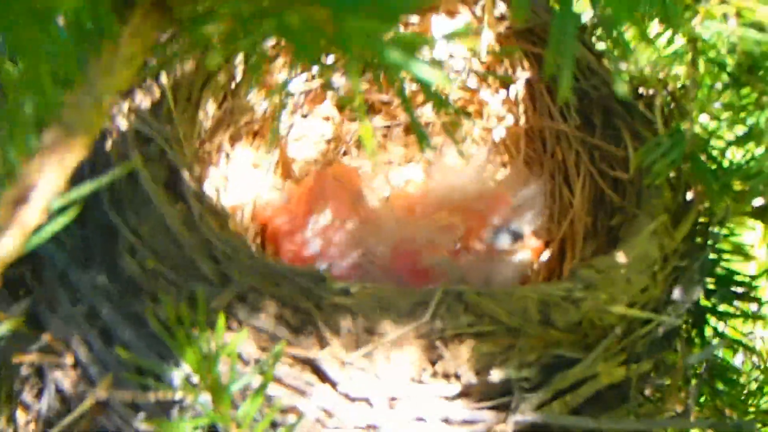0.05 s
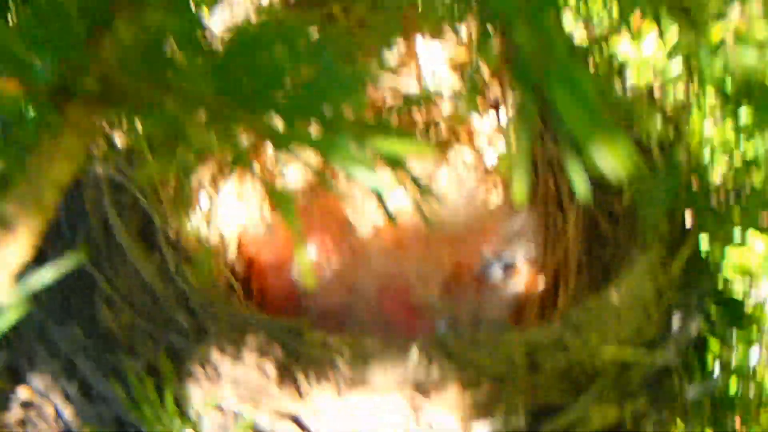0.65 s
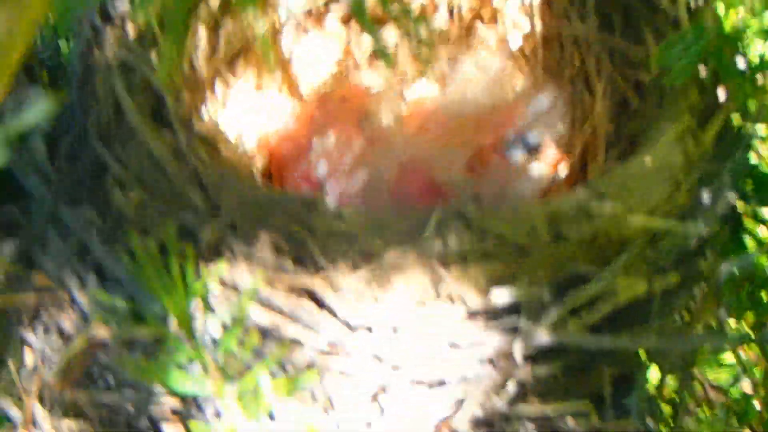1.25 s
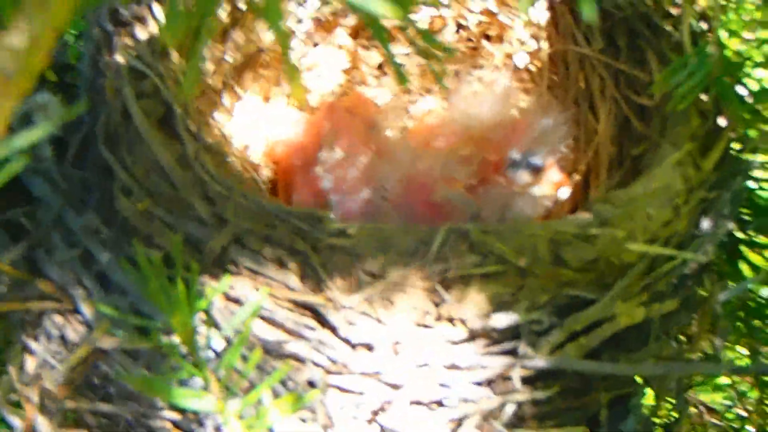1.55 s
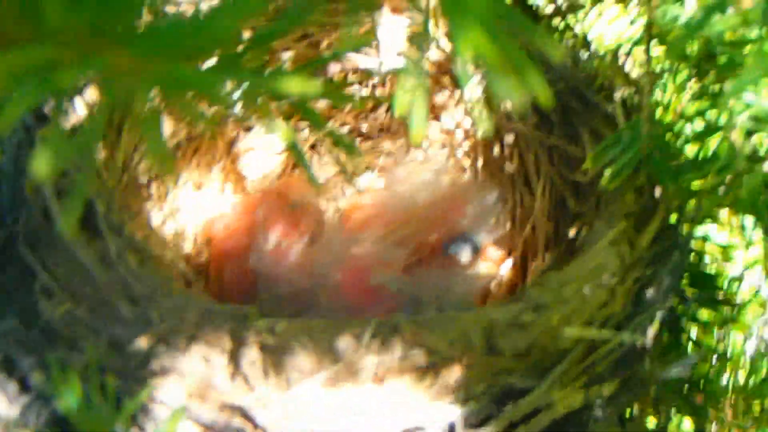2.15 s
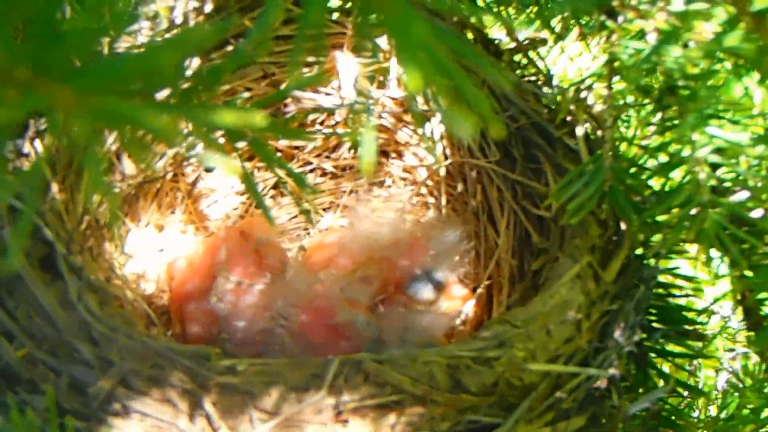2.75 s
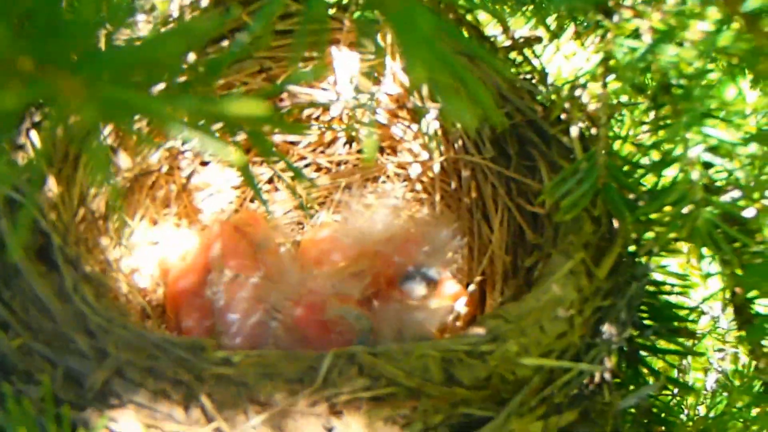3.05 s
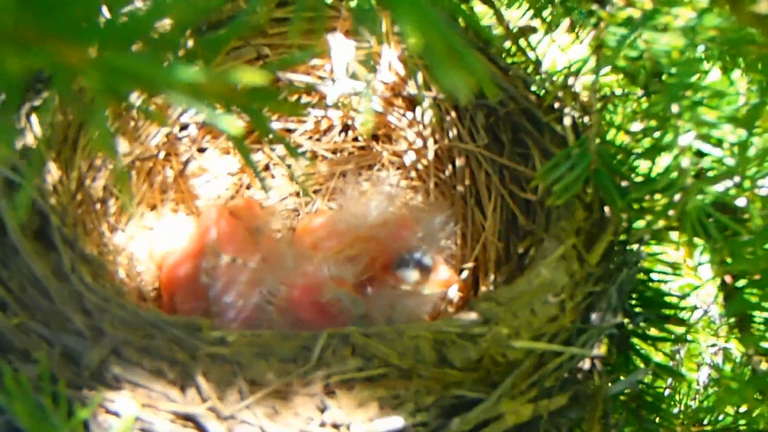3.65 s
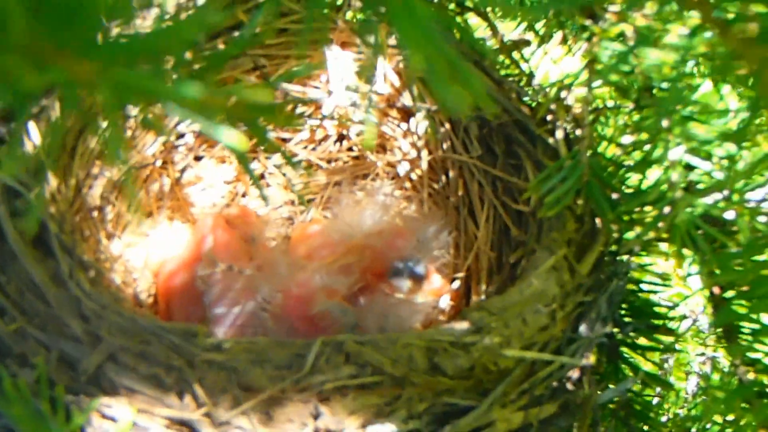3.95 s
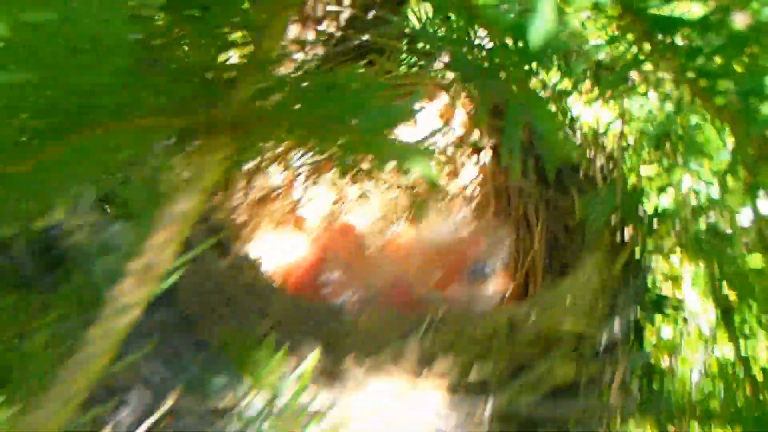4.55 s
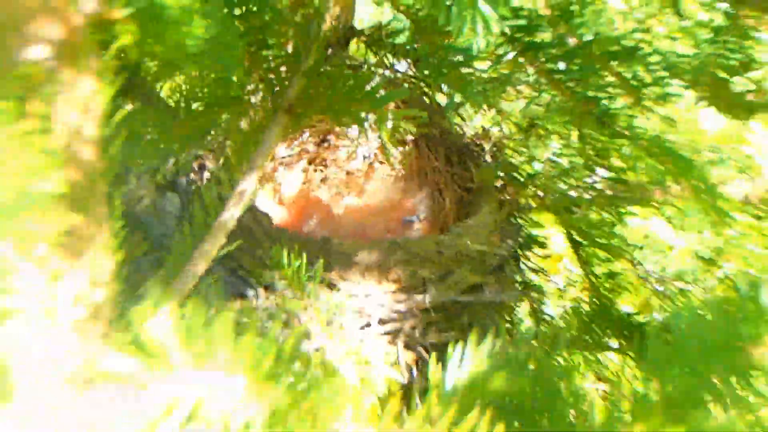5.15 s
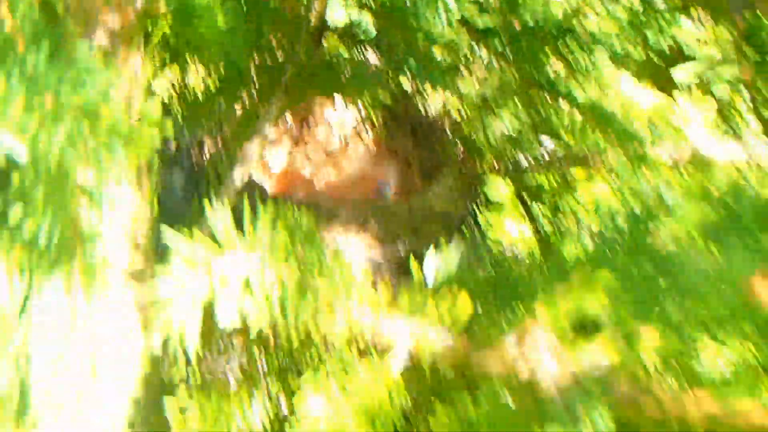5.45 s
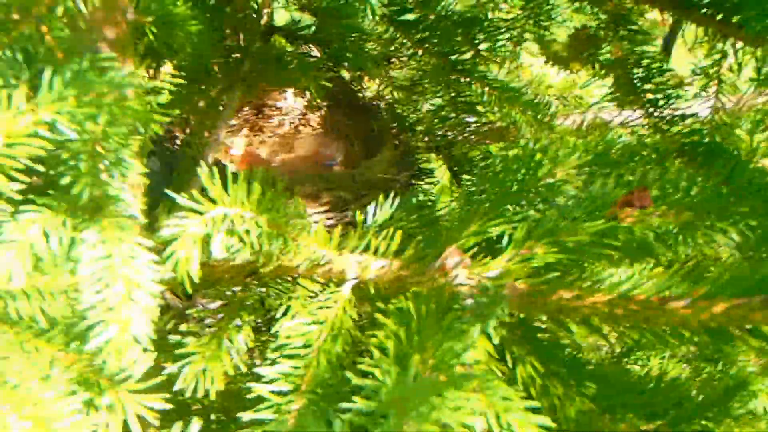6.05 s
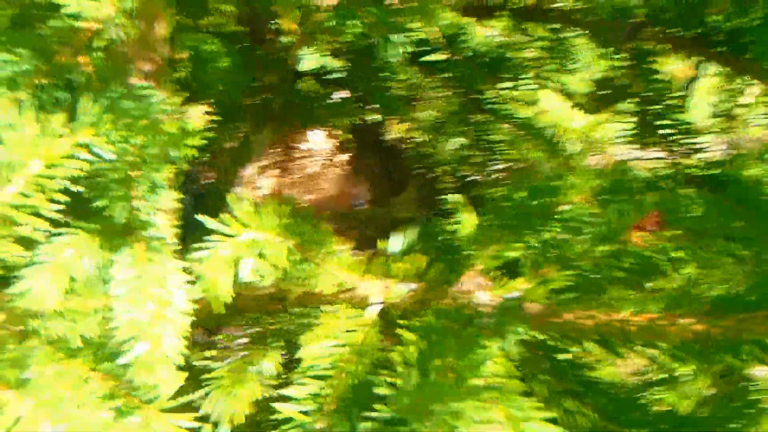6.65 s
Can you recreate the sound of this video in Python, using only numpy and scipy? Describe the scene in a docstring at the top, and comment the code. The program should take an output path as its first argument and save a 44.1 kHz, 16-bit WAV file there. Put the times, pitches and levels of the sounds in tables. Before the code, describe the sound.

Outdoors among evergreen branches, needles scrape and twigs crackle very close to the microphone, along with low handling rumble and knocks. After a lull, the branches sweep past once more with a quick cluster of snaps and a soft sleeve slide. Brief peeps of small distant birds come throughout, and at the end only they and a gentle airy hiss remain.

```python
"""Among the branches of a spruce, a hand-held camera pushes in, rests over a nest and draws back.
Needles sweep over its housing in a grainy swish, and twigs snap against it and make it ring a little.
Dragging branches make it rumble, and the hand bumps it now and then. Small birds chirp some way off
over soft outdoor air, and the camera's electronics hiss and whine faintly."""
import sys
import numpy as np
from scipy import signal
from scipy.fft import rfft, irfft
from scipy.io import wavfile

SR = 44100
rng = np.random.default_rng(int(sys.argv[2]) if len(sys.argv) > 2 else 0)


def master(y):
    """Save y as 16-bit WAV."""
    cut = np.clip(np.atleast_2d(y).T, -1, 1)
    pcm = np.round(cut * 32767)  # scale
    wavfile.write(sys.argv[1], SR, pcm.astype(np.int16))


N = 300321
TIME = np.arange(N) / SR
CUTOFF_HZ = 15750

# tone of the outdoor air and microphone hiss: (frequency [Hz], relative level [dB])
AIR_SPECTRUM = [(20, 0), (70, -2.5), (130, -5), (260, -6), (500, -7.5), (1000, -10), (1300, -9.5),
                (2000, -14.5), (3000, -17.5), (4200, -21.5), (5100, -20), (6200, -16.5), (8000, -17.7),
                (15500, -18.2)]
# falling bird peeps: (time [s], length [s], top pitch [Hz], level [dB])
PEEPS = [(0.298, 0.065, 3120, -40.5), (0.672, .04, 2800, -61), (1.17, 0.058, 2900, -37.5),
         (1.716, 0.051, 2640, -44.5), (2.533, 0.032, 3050, -42.5), (3.999, 0.04, 2760, -43.5),
         (6.007, 0.05, 2970, -48), (6.729, 0.044, 2900, -47.5)]
# how a peep falls: (share of the call [0-1], share of top pitch [0-1])
PEEP_FALL = [(0, .95), (.1, .99), (.22, 1), (.4, .95), (.7, .84), (1, .74)]
# two-voiced bird chirps: (time [s], length [s], lower voice's top pitch [Hz], lower voice's level [dB],
# upper voice's level before it is turned down [dB])
CHIRPS = [(2.49, 0.047, 1880, -35.5, -52), (4.745, 0.068, 1806, -38, -39),
          (5.739, .064, 1800, -48.5, -41.5), (6.483, 0.073, 1927, -37, -29)]
# how a chirp rises and falls: (share of the call [0-1], share of top pitch [0-1])
CHIRP_ARCH = [(0, .56), (.12, .74), (.25, .89), (.4, .975), (.56, 1), (.72, .985), (.84, .9), (.93, .75),
              (1, .58)]
# hand and branch bumping the camera, plus the casing's low note ringing after the snap at 1.1 s: (time [s],
# peak level [dB], pitch [Hz], time to fade 60 dB [s])
BUMPS = [(.082, -26, 115, 0.032), (.875, -31, 135, 0.045), (1.053, -31, 150, 0.02),
         (1.101, -22, 405, 0.086), (1.239, -27, 170, .013), (1.3307, -15.5, 163, 0.042),
         (1.336, -14.5, 306, 0.0089), (1.338, -28, 70.4, .05), (1.427, -8.5, 224, 0.0037),
         (1.431, -24.5, 47, 0.077), (2.871, -34, 520, 0.012), (3.693, -35, 1220, .025),
         (4.502, -36, 126, 0.076), (4.669, -36, 112, 0.04), (4.784, -37.5, 80, 0.056),
         (4.9, -43, 114, 0.077), (5.041, -38.5, 330, 0.041)]
# a branch sliding back over a sleeve: (time [s], level [dB])
SLEEVE_LEVELS = [(4.3, -73), (4.38, -56.5), (4.5, -53.5), (4.67, -56), (4.8, -55), (4.92, -53), (5.05, -63),
                 (5.2, -74)]
# peaks and dips in the tone of the housing and microphone opening: (frequency [Hz], width [Hz], gain [dB])
HOUSING_TONE = [(395, 42, 10.5), (680, 420, 12), (960, 380, -7), (1338, 650, 11), (2534, 1200, 10),
                (3890, 850, 10), (4630, 320, 12), (5530, 880, 6), (7340, 460, -7.5), (8890, 680, 6.5),
                (10990, 490, 3.5), (14000, 5900, -15)]
# notes of the casing that ring on after a snap: (pitch [Hz], gain [dB], time to fade 60 dB [s])
CASING_NOTES = [(404, -5, 0.062), (2500, -40, 0.037), (4930, -10, 0.033), (5820, -1.5, 0.074),
                (9800, -32, 0.15), (10900, -7, 0.045), (11300, -18, .06)]
# needles resting lightly on the camera until it comes clear: (time [s], level [dB])
RESTING_TOUCH = [(0, -53.5), (1.25, -54), (1.4, -59), (2.3, -57.5), (2.6, -67), (3.85, -62), (4.7, -59.5),
                 (5.05, -60.5), (5.3, -85)]
# branches brushing past; woodiness is below 0 for soft tips and above 0 for a bare stem:
# (time of firmest touch [s], build-up [s], release [s], level [dB], woodiness [dB])
BRANCH_STROKES = [(0.114, .05, .3, -36.5, -1), (.35, .08, .1, -42, 3), (.45, .14, 0.13, -35, -3),
                  (0.561, .16, 0.09, -31.5, -2.5), (0.801, 0.14, .11, -33.5, 0.5),
                  (0.951, 0.12, .09, -37, 3), (1.085, .06, 0.054, -35, 7), (1.219, 0.17, .22, -39, 1),
                  (1.6, .16, .5, -46, -2), (1.86, .04, .06, -46.5, -1), (1.96, .12, 0.11, -40, -2.5),
                  (2.089, .1, .14, -44.5, -7), (2.235, 0.07, .08, -46.5, -7), (2.402, .14, 0.089, -49, 3),
                  (2.514, .04, .04, -46.5, -8.5), (2.87, .2, 0.18, -60.5, 16), (3.089, .12, .45, -53, 1.5),
                  (3.62, .15, .3, -52.5, 3.5), (3.98, 0.16, .45, -48, 2), (4.2, .2, .1, -47.5, 7),
                  (4.281, .1, .1, -35.5, -4.5), (4.347, 0.055, 0.037, -43.5, 5),
                  (5.05, 0.15, .16, -56.5, 7.5)]
# the main twig snaps; brightness is below 0 for thick wood and above 0 for thin tips:
# (time [s], length [s], level [dB], brightness [dB], twig's pitch [Hz], boost at that pitch [dB])
TWIG_SNAPS = [(.0401, 0.008, -34, -2.5, 2670, 11), (0.1029, 0.0031, -11.5, 3.5, 4540, 5.3),
              (0.118, 0.011, -29, -2, 3800, 12), (0.1693, 0.002, -28, 13, 7250, 17),
              (0.2142, 0.0025, -30, 2, 4080, 7.2), (0.3222, 0.0015, -19, 2, 9700, 25),
              (0.393, 0.0018, -18, -0.5, 4650, 8.7), (0.4176, 0.0022, -10.5, 7, 5400, 18),
              (0.4379, 0.0032, -14, 6, 5370, 12), (0.464, 0.0026, -17.5, 2, 4450, 12),
              (0.474, 0.0015, -19.5, -2, 4600, 14), (0.4927, 0.0038, -14.5, 4, 4670, 12),
              (0.533, 0.0028, -12.5, 4.5, 9130, 19), (0.561, 0.0091, -29, 1, 4460, 12),
              (0.5678, 0.0037, -11, 3, 4000, 23), (0.5806, 0.0064, -24, 3, 3730, 14),
              (0.6091, 0.0065, -16.5, -2.5, 4070, 6.4), (0.6375, 0.0077, -21, 6, 8600, 9.4),
              (0.7357, 0.0083, -33, 3, 11200, 5.3), (0.8027, 0.0033, -16, -1.5, 2770, 3.1),
              (0.8256, 0.0027, -10.5, 0.5, 4000, 11), (.925, 0.01, -33.5, -15, 2420, 17),
              (0.952, 0.0048, -23, 0.5, 4000, 18), (1.0765, 0.0071, -23, -21, 2120, 16),
              (1.086, 0.0039, -19.5, -13.5, 2270, 23), (1.0988, 0.0019, -12.5, -13, 1800, 13),
              (1.2146, 0.0062, -28.5, -3.5, 2880, 11), (1.2641, 0.0056, -23.5, -2, 8400, 6),
              (1.5992, 0.00083, -18.5, -1.5, 3590, 8), (1.6985, .0015, -32, -3, 2080, 7.1),
              (1.787, 0.0043, -24, -5.5, 1300, 10), (1.8611, 0.0028, -11.5, -1.5, 1930, 41),
              (1.924, 0.0028, -28, 0, 3950, 8), (1.9283, 0.0029, -19.5, 1, 1500, 14),
              (1.946, 0.0024, -30, 1, 6700, 10), (1.9568, .0091, -35, 1, 8740, 10),
              (1.967, .0026, -20, -3.5, 2970, 18), (1.98, 0.0022, -14.5, 0.5, 10800, 10),
              (2.0046, 0.0067, -24.5, 0, 4690, 6.9), (2.021, 0.0012, -19, -2, 3660, 24),
              (2.0672, 0.0013, -23, 2, 4470, 10), (2.096, 0.0017, -27, -2.5, 4400, 14),
              (2.1649, 0.0033, -30, 0, 4400, 9.4), (2.1803, 0.0015, -26.5, -2, 4670, 10),
              (2.2196, 0.0028, -6.5, 2.5, 2340, 12), (2.2526, 0.0059, -19, -1, 2060, 16),
              (2.261, .0082, -30, -3, 2070, 7.8), (2.4098, 0.0061, -40, -20, 1590, 6),
              (2.515, 0.0036, -9, 3, 5800, 6.8), (3.0477, 0.0094, -45.5, -4, 4900, 7),
              (3.25, 0.0033, -37.5, -3.5, 2840, 13), (3.299, .0033, -43, -2, 6560, 10),
              (3.5956, .0026, -34, -15, 1200, 16), (3.853, .0107, -47, -3, 4400, 7),
              (3.954, 0.0063, -33, -1, 9300, 9), (4.0786, 0.00088, -20.5, 0, 4570, 14.6),
              (4.1218, 0.0016, -33.5, 1, 3630, 5), (4.2114, .0021, -34, -7, 2060, 11),
              (4.2309, 0.0039, -26.5, -2, 11400, 13), (4.2518, 0.0058, -13.5, -2, 2290, 14),
              (4.263, 0.0048, -18, 1, 8650, 5.7), (4.2758, 0.0015, -6, 2, 5700, 8),
              (4.2963, .0012, -18, 7, 3840, 8), (4.314, 0.0025, -20.5, 6, 3730, 8.6),
              (4.3181, 0.003, -15, 1.5, 8460, 14), (4.3247, 0.005, -17.5, -2.5, 3750, 18),
              (4.3367, 0.0021, -18, 1, 3470, 15), (5.099, 0.0042, -38, 4.5, 10300, 17)]
# the four parts of a snap, in the order knock, wood, crack, tip: (low edge [Hz], high edge [Hz])
SNAP_BANDS = [(220, 850), (1150, 3000), (3000, 7000), (7000, 15500)]


def from_db(db):
    """Turn decibels into a gain to multiply by."""
    return 10 ** (np.asarray(db) / 20)


def unit_power(x):
    """Scale a signal to an average power of 1."""
    return x / np.sqrt(np.mean(x ** 2) + 1e-20)


def band(x, low_hz, high_hz, order=3):
    """Keep the sound between two frequencies."""
    sections = signal.butter(order, [low_hz, high_hz], "band", fs=SR, output="sos")
    return signal.sosfilt(sections, x + 1e-18)


def drift(turns_per_s):
    """A random wobble with a typical size of 1."""
    points = rng.standard_normal(4000)
    return unit_power(np.interp(TIME * turns_per_s, np.arange(len(points)), points))


def peak_filter(hz, width_hz, gain_db):
    """Design a filter that lifts or lowers the sound around one frequency."""
    height = from_db(gain_db / 2)
    damp = np.tan(np.pi * width_hz / SR)
    turn = -2 * np.cos(2 * np.pi * hz / SR)
    forward = [1 + damp * height, turn, 1 - damp * height]
    feedback = [1 + damp / height, turn, 1 - damp / height]
    return np.array(forward + feedback) / feedback[0]


def resonate(x, hz, width_hz):
    """Let a sound ring at one pitch; a narrower width rings longer."""
    decay = np.exp(-np.pi * width_hz / SR)
    forward = np.array([1, 0, -1]) * (1 - decay ** 2) / 2
    feedback = [1, -2 * decay * np.cos(2 * np.pi * hz / SR), decay ** 2]
    return signal.lfilter(forward, feedback, x + 1e-18)


def air(level_db=-51):
    """Soft outdoor air and microphone hiss blend into one steady noise."""
    hz, db = np.transpose(AIR_SPECTRUM)
    bin_hz = np.maximum(np.arange(N // 2 + 1) * SR / N, 1)
    gain = from_db(np.interp(np.log(bin_hz), np.log(hz), db)) * (bin_hz < CUTOFF_HZ)
    return from_db(level_db) * unit_power(irfft(rfft(rng.standard_normal(N)) * gain, N))


def electronic_whine(level_db=-66, frames_per_s=30, first_frame_s=0.0061, sharpness=3.7):
    """The electronics give a thin whine that pulses once per picture frame."""
    pulse = np.exp(sharpness * np.cos(2 * np.pi * frames_per_s * (TIME - first_frame_s)))
    whine = band(rng.standard_normal(N), low_hz=5480, high_hz=5850, order=2)
    return from_db(level_db) * unit_power(pulse * whine)


def whistle(start, length, top_hz, level_db, contour, swell, grow_db=0, rasp=0):
    """One voice of a bird: a pure tone that glides, swells and fades, and may rasp near its end."""
    along = np.linspace(0, 1, round(length * SR))
    flutter = np.interp(along, np.linspace(0, 1, 60), rng.standard_normal(60))
    hz = top_hz * np.interp(along, *np.transpose(contour)) * (1 + rasp * along ** 2 * flutter)
    loudness = from_db(level_db + grow_db * along) * np.abs(np.sin(np.pi * along)) ** swell
    tone = np.sin(2 * np.pi * np.cumsum(hz) / SR)
    return np.pad(loudness * tone, (round(start * SR), N))[:N]


def birds(upper_ratio=1.72, upper_trim_db=-18, echo_db=-15, echo_fade_s=0.23):
    """Falling peeps and two-voiced chirps echo faintly off the trees."""
    calls = sum(whistle(*peep, PEEP_FALL, swell=0.45) for peep in PEEPS)
    for start, length, hz, lower_db, upper_db in CHIRPS:
        calls += whistle(start, length, hz, lower_db, CHIRP_ARCH, swell=1.37)
        calls += whistle(start, length, hz * upper_ratio, upper_db + upper_trim_db, CHIRP_ARCH,
                         swell=0.35, grow_db=6, rasp=0.03)
    age = np.arange(SR // 2) / SR
    trees = rng.standard_normal(len(age)) * from_db(-60 * age / echo_fade_s) * (age > 0.008)
    echo = signal.fftconvolve(calls, trees / np.linalg.norm(trees))[:N]
    return calls + from_db(echo_db) * echo


def rumble(rub, gain_db=-8, grip_limit_db=-42.5, wobble_db=2.5):
    """The camera rumbles as branches drag on it, as far as the grip lets it."""
    drag = np.minimum(rub, from_db(grip_limit_db))
    shaking = band(rng.standard_normal(N), low_hz=36, high_hz=230, order=2)
    return unit_power(shaking * from_db(wobble_db * drift(25))) * drag * from_db(gain_db)


def bumps():
    """Each bump sets the camera shaking at one pitch, which quickly dies away."""
    out = np.zeros(N)
    age = np.arange(SR // 4) / SR
    for start, peak_db, hz, fade_s in BUMPS:
        at = round(start * SR)
        out[at:at + len(age)] += from_db(peak_db - 60 * age / fade_s) * np.sin(2 * np.pi * hz * age)
    return out


def sleeve_slide(flutter_db=3):
    """A sleeve hisses softly as the arm draws back through the needles."""
    level_db = np.interp(TIME, *np.transpose(SLEEVE_LEVELS), left=-120, right=-120)
    hiss = unit_power(band(rng.standard_normal(N), low_hz=3800, high_hz=9500, order=1))
    return hiss * from_db(level_db + flutter_db * drift(72))


def housing(x):
    """Needles and twigs are heard through the camera body, which colours their tone."""
    return signal.sosfilt(np.array([peak_filter(*row) for row in HOUSING_TONE]), x + 1e-18)


def casing_ring(x):
    """Hard contacts leave the casing ringing faintly."""
    return x + sum(from_db(db) * resonate(x, hz, width_hz=np.log(1000) / (np.pi * fade_s))
                   for hz, db, fade_s in CASING_NOTES)


def branch_pressure(swell_db=21, rub_db=-2.5, fizz_db=-9.5, fizz_loss=1.06):
    """How strongly passing branches swish, rub and fizz: bare stems rub more, soft tips fizz more."""
    resting = from_db(np.interp(TIME, *np.transpose(RESTING_TOUCH)))
    power = (resting * from_db([[0], [rub_db], [fizz_db]])) ** 2
    for firmest, build, release, level_db, woody_db in BRANCH_STROKES:
        # 0 at the firmest touch, 1 a whole build-up before it or a whole release after it
        away = np.maximum((firmest - TIME) / build, (TIME - firmest) / release)
        near = away < 3
        balance = from_db([[0], [rub_db + woody_db], [fizz_db - fizz_loss * woody_db]])
        power[:, near] += (balance * from_db(level_db - swell_db * away[near])) ** 2
    return np.sqrt(power)


def needles(low_hz, high_hz, pricks_per_s, pitches, spread_db=7, friction_db=-4):
    """Needles of many pitches prick the housing at random, over smooth rubbing."""
    out = 0
    for hz in np.geomspace(low_hz, high_hz, pitches):
        sizes = from_db(spread_db * np.minimum(rng.exponential(1, N), 3)) * rng.choice([-1, 1], N)
        pricks = unit_power(sizes * (rng.random(N) < pricks_per_s / pitches / SR))
        friction = from_db(friction_db) * rng.standard_normal(N)
        out += unit_power(resonate(pricks + friction, hz, width_hz=hz / 4))
    return unit_power(band(housing(out), low_hz * 0.66, high_hz * 1.1, order=2))


def needle_sweep(swish, rub, fizz, catch_db=3):
    """Thousands of needle pricks merge into a grainy swish that catches and runs."""
    middle = needles(1085, 4580, pricks_per_s=1700, pitches=10) * swish * from_db(-1)
    low = needles(301, 820, pricks_per_s=850, pitches=5) * rub * from_db(-2.5)
    high = needles(6800, 14400, pricks_per_s=850, pitches=5) * fizz * from_db(-2)
    return (middle + low + high) * from_db(catch_db * drift(70))


def small_twigs(swish, count=60, crowding=0.4, over_swish_db=4, spread_db=3,
                length_s=0.004, brightness_db=-2.5, low_hz=1400, high_hz=7000, boost_db=8):
    """Random rows like TWIG_SNAPS: small twigs tick louder and more often as a branch presses harder."""
    when, size, thinness = rng.random((count, 3)).T
    chances = np.cumsum(swish ** crowding)
    at = np.searchsorted(chances, when * chances[-1])
    levels = 20 * np.log10(swish[at]) + over_swish_db + spread_db * (2 * size - 1)
    pitches = low_hz * (high_hz / low_hz) ** thinness
    return [(start, length_s, db, brightness_db, hz, boost_db)
            for start, db, hz in zip(at / SR, levels, pitches)]


def snap_balance(level, brightness, pitch, stem_db, usual_db=-21.5, crack_hz=4200, crack_octaves=0.73):
    """Gains of a snap's four parts: thick twigs knock, thin ones tick, those in between mostly crack."""
    # near the crack pitch, the wood and tip parts give way
    focus_db = 5.5 * np.exp(-(np.log2(pitch / crack_hz) / crack_octaves) ** 2)
    # the knock is stronger while a stem touches the camera
    knock_db = -9.5 - 0.27 * (level - usual_db) - 0.54 * brightness + 0.98 * stem_db
    wood_db = -1 - brightness - focus_db
    crack_db = np.zeros_like(level)
    tip_db = -1.5 + brightness - focus_db
    gains = from_db([knock_db, wood_db, crack_db, tip_db])
    return gains / np.sqrt(np.sum(gains[1:] ** 2, axis=0))


def twig_slips(length, pitch, boost, rise_s=0.001, sag=0.91, stop_s=0.0014,
               shiver_db=-22, shiver_s=0.0051, grit_db=2.5):
    """Each twig lets go in a few milliseconds of tiny slips, then shivers out at its own pitch."""
    age = np.arange(SR // 8) / SR
    progress = np.minimum(age / length, 1)
    since_end = np.maximum(age - length, 0)
    slipping = np.minimum(age / rise_s, 1) * np.exp(-sag * progress - since_end / stop_s)
    shiver = from_db(shiver_db) * progress * np.exp(-since_end / shiver_s)
    noise, grit = rng.standard_normal((len(length), 2, len(age))).transpose(1, 0, 2)
    slips = housing(noise * from_db(grit_db * grit) * (slipping + shiver))
    return np.array([signal.sosfilt([peak_filter(hz, width_hz=250 + 0.12 * hz, gain_db=db)], slip)
                     for slip, hz, db in zip(slips, pitch[:, 0], boost[:, 0])])


def twig_snaps(twigs, stem_db):
    """Twigs snap on the casing, each with its own mix of knock, wood, crack and tip."""
    start, length, level, brightness, pitch, boost = np.transpose(twigs)[:, :, None]
    slips = twig_slips(length, pitch, boost)   # one row per twig
    gains = snap_balance(level, brightness, pitch, np.interp(start, TIME, stem_db))
    snaps = 0
    for edges, gain in zip(SNAP_BANDS, gains):
        part = band(slips, *edges)
        energy = np.sum(part ** 2, axis=1, keepdims=True)
        snaps += part * gain * np.sqrt(length * SR / energy)
    out = np.zeros(N + slips.shape[1])
    for start_s, snap in zip(start[:, 0], snaps * from_db(level)):
        at = round(start_s * SR)
        out[at:at + len(snap)] += snap
    return casing_ring(out[:N])


def scene():
    """Passing branches drive the swish, small twigs and rumble; everything meets at one microphone."""
    swish, rub, fizz = branch_pressure()
    snaps = twig_snaps(TWIG_SNAPS + small_twigs(swish), stem_db=20 * np.log10(rub / swish))
    close_sounds = snaps + needle_sweep(swish, rub, fizz) + sleeve_slide() + rumble(rub) + bumps()
    return (close_sounds + birds() + air() + electronic_whine())[None, :]


def record(dry):
    """Peaks beyond full scale are flattened, and the highest treble is cut steeply."""
    treble_cut = signal.ellip(12, 0.1, 80, CUTOFF_HZ, fs=SR, output="sos")
    return signal.sosfilt(treble_cut, np.clip(dry, -1, 1))


dry = scene()
out = record(dry)
master(out)
```